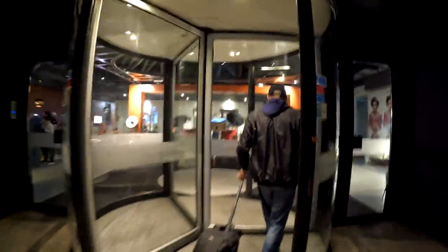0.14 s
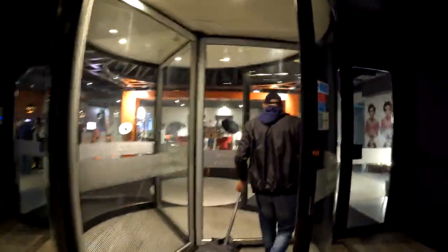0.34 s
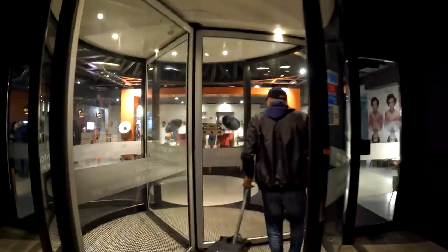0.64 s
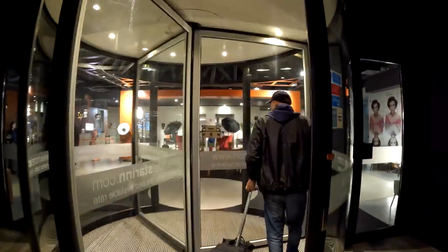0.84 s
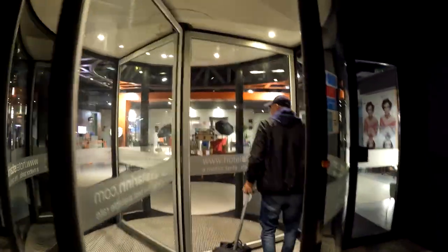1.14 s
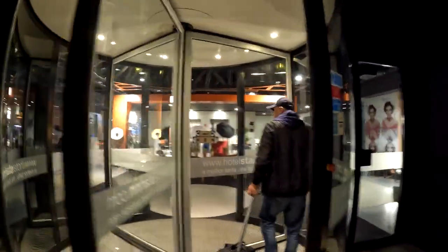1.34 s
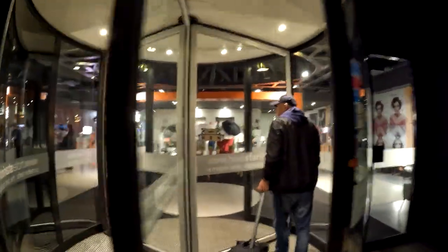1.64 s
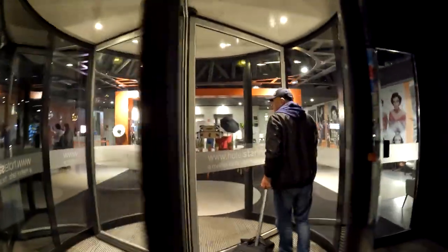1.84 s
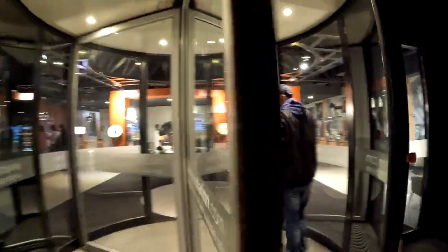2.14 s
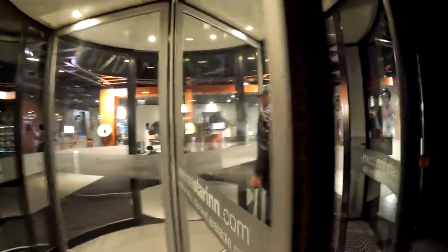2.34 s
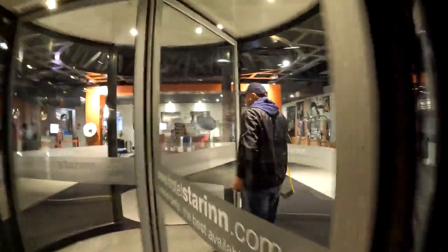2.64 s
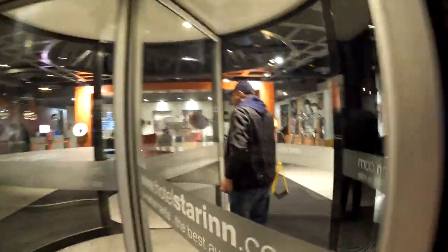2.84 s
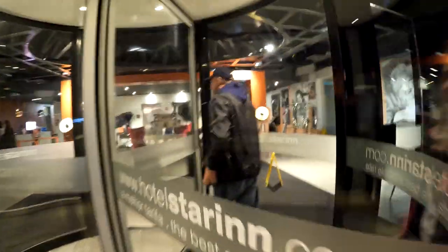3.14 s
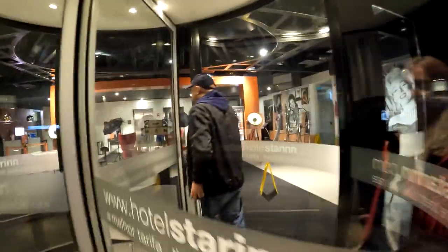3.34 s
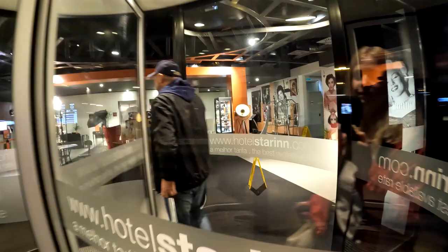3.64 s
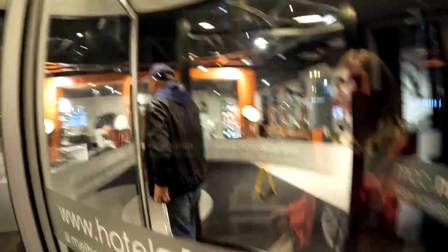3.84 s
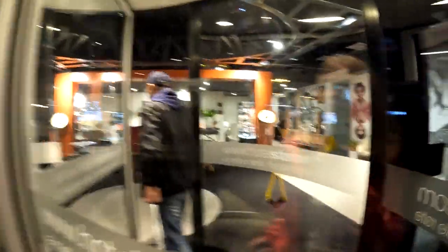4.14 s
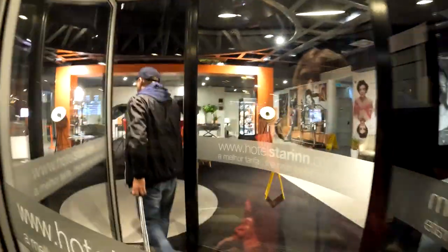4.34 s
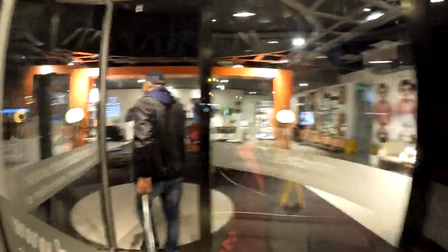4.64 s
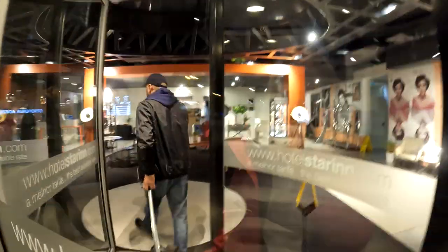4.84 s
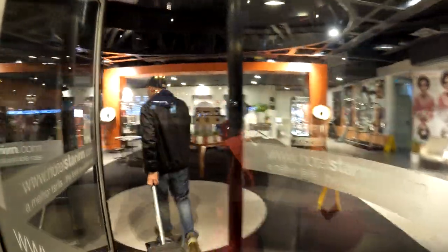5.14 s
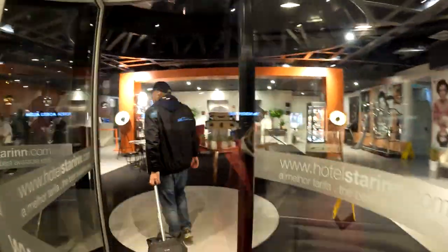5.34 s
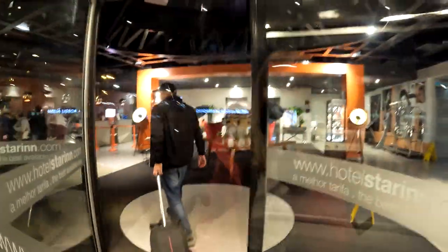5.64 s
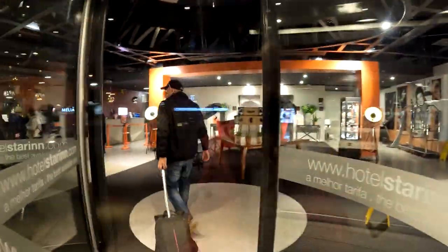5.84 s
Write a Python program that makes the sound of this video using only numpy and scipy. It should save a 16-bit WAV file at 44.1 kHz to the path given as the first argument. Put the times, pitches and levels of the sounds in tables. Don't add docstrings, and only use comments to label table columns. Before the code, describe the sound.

A hollow wheeled suitcase rolls close to a stereo microphone, entering a revolving glass door from the street. From 0 s a low, throbbing drone wavers under soft panel hums, with a steady dull wash of distant traffic and very faint hiss. Small plastic knocks, zip flicks and scuffs scatter through the first 1.2 s; then it is sparser and the rumble weaker, dipping around 2 s before a dull bump at 2.2 s. Low thuds at 3.1 s and a sharp click at 3.3 s lead to a heavy thump at 3.6 s. From 3.85 to 4.2 s the handle rattles and scrapes in a dense clatter, with hard wheel bumps and tiny metallic pings. Then the rumble grows fuller, with sparse ticks and a light bump at 4.8 s. It swells strongest near 5.65 s, with a low thud at 5.7 s and crisp taps until the end. Small sounds carry a brief enclosed reflection.

```python
import sys
import numpy as np
from scipy import signal
from scipy.io import wavfile
from scipy.ndimage import uniform_filter1d

SR = 44100
rng = np.random.default_rng(int(sys.argv[2]) if len(sys.argv) > 2 else 0)


def dump_mix(stems):
    frames = np.atleast_2d(stems).T
    limited = np.clip(frames, -1, 1)
    pcm = np.round(limited * 32767).astype(np.int16)
    wavfile.write(sys.argv[1], SR, pcm)


def boost_factor(decibels):
    exponent = np.asarray(decibels, float) / 20
    return 10 ** exponent


N = 264159
RUN_IN = SR // 2

# mode_hz, width_hz, level_db
DRONE_MODES = [(54.1, 5.5, 4.5), (59.3, 20.1, -0.5)]
# mode_hz, width_hz, level_db
LARGE_PANEL_MODES = [(106.2, 7.4, -3.5), (124.8, 24, -5), (140, 32, -4)]
# mode_hz, width_hz, level_db
SMALL_PANEL_MODES = [(188.7, 8.1, 1), (237.8, 8.3, -1.5), (279, 12.6, 0), (348, 70, -17.5)]
# time_s, level_db
WHEEL_LOAD = [(0, -23.5), (.15, -23.5), (.45, -21), (.85, -27), (1.25, -24), (1.6, -26), (2.0, -29),
              (2.25, -26), (2.7, -26.5), (3.4, -24.5), (3.55, -21), (4.4, -19), (4.65, -21.5), (4.85, -18),
              (5.1, -21.5), (5.3, -20), (5.65, -15), (5.99, -24.5)]
# centre_s, swell_db
LURCHES = [(.12, 0), (.42, 6.5), (.56, 6), (.98, -6), (1.97, 10), (2.27, 10.5), (2.88, 9.5), (2.99, 4.5),
           (3.06, 18), (3.22, 10.5), (3.37, 16.5), (3.6, -8), (3.95, 6), (4.3, 7), (4.62, -3), (4.84, 9),
           (5.05, 10), (5.2, 11), (5.4, 5), (5.72, 17), (5.91, 14)]
# centre_s, swell_db
SKIPS = [(.17, -3), (.38, -19), (.53, -4.5), (.77, 4), (.97, -40), (2.0, -19), (2.2, -24), (2.94, 0),
         (3.07, -8), (3.603, 1), (4.1, -4), (4.77, -3), (5.56, -5), (5.71, -15)]
# centre_s, swell_db
BOOMS = [(.02, 5.5), (.17, 8), (.33, 1.5), (.58, 8), (2.02, 13.5), (2.96, 7), (3.1, 10.5), (3.45, 9),
         (3.6, 8), (3.75, 5), (3.95, 7), (4.1, 7.5), (4.68, 10), (4.82, 11), (5.0, 6.5), (5.14, -2),
         (5.4, 3), (5.81, 6.5)]
# centre_s, swell_db
HUMS = [
    (.45, 7.9),
    (1.55, 2.8),
    (1.8, 4.8),
    (3.1, 3.5),
    (4.05, 0.99),
    (5.35, 7.3),
    (5.62, 8.9),
    (5.88, 4.9),
]
# freq_hz, level_db per Hz
STREET_SPECTRUM = [(47, -30), (80, -2), (113, -7.5), (276, -11), (340, -15), (471, -20), (592, -18.5),
                   (758, -23), (952, -19), (1420, -24.5), (2380, -34.5), (4500, -44), (7600, -52.5),
                   (9880, -84), (16700, -120)]
# freq_hz, level_db per Hz
AIR_SPECTRUM = [(8000, 6), (11000, 5), (13000, 0), (15500, -2)]
# time_s, level_db
TRAFFIC = [
    (0, -35.5),
    (1.5, -36),
    (3.7, -36.5),
    (4.05, -35),
    (4.35, -37),
    (5.99, -35),
]
# freq_hz, likeness (0 to 1)
LIKENESS = [(60, 1), (190, 1), (280, 0.98), (550, 0.89), (1100, 0.75), (2200, 0.52), (5000, 0.63),
            (9500, 0.87), (13000, 0.41)]
# freq_hz, left_minus_right_db
LEAN = [(250, 0), (520, 1), (1500, 2), (4400, 0), (8000, 1.5), (13000, 3)]
# start_s, length_s, pitch_hz, level_db
SINGS = [(0, 0.47, 255, -38.5), (.1, 1.1, 188, -33), (1.25, 0.99, 186, -36.5), (1.5, 0.56, 278, -35),
         (2.2, 0.4, 280, -43), (2.75, 0.39, 278, -34.5), (.1, 0.32, 120, -33), (3.0, 1.45, 105, -27.5),
         (3.3, 0.66, 230, -39), (4.1, 0.89, 178, -33.5), (4.95, 0.23, 140, -25.5), (5.12, 0.4, 140, -30.5),
         (5.55, 0.51, 310, -39)]
# start_s, peak_db, pitch_hz
KNOCKS = [(0.05, -44, 1090), (0.322, -45, 1690), (.542, -45, 1490), (.9956, -61, 1360), (1.108, -44, 1400),
          (2.7594, -56, 1350), (3.276, -56, 1310), (3.301, -53, 1500), (3.6094, -48, 1550),
          (3.644, -43, 1350), (3.842, -38, 1860), (3.921, -38, 1900), (3.915, -41, 1400),
          (4.015, -54, 1420), (4.109, -51, 2430), (4.171, -40, 1860), (4.206, -44, 1420),
          (4.344, -48, 1380), (4.916, -62, 1360), (5.056, -41.5, 1380), (5.504, -46, 1420),
          (5.564, -45, 1730), (5.692, -38, 1530), (5.759, -41, 1480), (5.8307, -37, 1500),
          (5.974, -47, 1820)]
# start_s, peak_db, brightness_db
FLICKS = [(.599, -35, -34), (.721, -34.5, -28), (.8969, -35, -32), (.9956, -36, -25), (1.063, -45, -7),
          (1.108, -38, -32), (1.175, -41, -12), (1.671, -33, -19), (2.398, -38, -18), (3.298, -45, -9),
          (3.859, -45, -29), (3.975, -44, -6), (4.002, -30, -40), (4.015, -29, -15), (4.091, -29, -27),
          (4.1094, -33, -3), (4.17, -34, -32), (4.206, -27.5, -37), (4.344, -32, -28), (4.822, -33.5, -23),
          (4.916, -42, -17), (5.191, -32, -16), (5.215, -48, -10), (5.307, -46, -8), (5.391, -29, -25),
          (5.503, -40, -25), (5.6915, -31, -33), (5.8296, -27, -40), (5.859, -34, -14), (5.908, -59, -11)]
# start_s, peak_db, brightness_db
SCUFFS = [(.143, -36, -26), (.298, -38.5, -17), (.33, -48, -22), (.452, -29, -30), (.542, -36, -18),
          (.964, -33.5, -28), (2.296, -35, -28), (2.473, -44, -20), (2.7594, -44, -24), (3.278, -30.5, -22),
          (3.308, -33, -17), (3.4, -38, -28), (3.6094, -32.5, -21), (3.644, -40, -21), (3.841, -25.5, -26),
          (3.972, -31, -16), (4.075, -25, -22), (4.358, -31, -21), (4.6423, -32.5, -13.5),
          (4.8928, -40, -22), (4.935, -49, -16), (5.033, -42, -15), (5.0554, -35, -27), (5.564, -35, -36),
          (5.759, -30, -22), (5.974, -29, -23)]
# start_s, peak_db, brightness_db
RUSTLES = [(.2, -39.5, -26), (.46, -48, -22), (.99, -47, -22), (2.3, -40, -27), (2.42, -41, -18),
           (2.72, -41, -23), (3.3, -48, -18), (4.88, -44, -13), (5.03, -44, -13), (5.2, -51, -18),
           (5.47, -38, -37), (5.86, -43, -15)]
# start_s, peak_db, knock_hz, t60_s
BUMPS = [(0.053, -13, 530, 0.013), (2.166, -3.5, 202, 0.015), (3.106, -10, 300, 0.031),
         (3.126, -5, 235, 0.027), (3.594, 4, 123, 0.043), (3.608, 2, 109, 0.028), (3.617, -22, 181, 0.046),
         (3.847, -23, 730, 0.038), (3.942, -20, 515, 0.021), (3.989, -19, 550, 0.025),
         (4.0291, -7, 152, 0.036), (4.0358, 8, 219, 0.011), (4.045, -8, 357, 0.021),
         (4.054, -28, 250, 0.028), (4.0844, -6, 117, 0.034), (4.088, -33, 910, 0.016),
         (4.123, -13.5, 392, 0.048), (4.126, -32, 890, 0.027), (4.128, -21, 1080, 0.018),
         (4.1335, -13, 380, 0.015), (4.1366, -9, 355, 0.033), (4.142, -8, 124, 0.059),
         (4.15, -23, 332, 0.11), (4.16, -22, 420, 0.041), (4.78, -10.5, 302, 0.026), (5.698, -11, 89, 0.14)]
# start_s, pitch_hz, level_db, length_s
PINGS = [(.468, 4000, -48, .034), (.49, 12300, -63, .035), (.492, 6950, -61, .03), (.556, 4000, -61, .044),
         (.721, 4015, -50, .05), (.995, 4015, -49, .048), (1.097, 4200, -52, .03), (1.155, 5030, -54, .03),
         (1.285, 9900, -68, .04), (1.95, 9900, -68, .04), (3.607, 9300, -61, .02), (3.648, 11300, -67, .03),
         (3.897, 6900, -53, .02), (3.97, 12800, -63, .03), (3.984, 11200, -53, .012),
         (4.02, 12800, -58, .03), (4.021, 11320, -47, .011), (4.031, 11320, -50, .009),
         (4.04, 11300, -47, .013), (4.215, 14300, -66, .06), (5.14, 6950, -59, .016),
         (5.216, 7050, -56, .012), (5.31, 11600, -61, .04), (5.562, 4300, -49, .011),
         (5.86, 9400, -54, .012), (5.873, 6900, -46, .034), (5.874, 9200, -55, .01),
         (5.93, 8700, -57, .018)]
# start_s, peak_db, centre_hz
CRACKS = [(.872, -44, 9000), (.957, -42, 11000), (1.671, -35, 9400), (3.3016, -25.5, 2760),
          (3.302, -32, 10300), (3.3021, -33, 12500), (3.3142, -37, 12500), (3.321, -42, 11500),
          (3.406, -42, 10000), (3.943, -40, 11000), (4.1115, -38, 6000), (4.112, -21, 10100),
          (4.1122, -27, 13000), (4.126, -25, 10500), (4.1706, -29, 1010), (4.25, -43, 9500),
          (4.45, -42, 3000), (4.775, -42, 8000), (4.917, -39.5, 3000), (5.1915, -40, 6500),
          (5.391, -42, 6500), (5.508, -40, 6000), (5.692, -35, 3330), (5.694, -37, 7800),
          (5.761, -33, 5000), (5.813, -45, 6000), (5.8295, -45, 4870), (5.8355, -33, 3560),
          (5.862, -46, 5000), (5.917, -34, 7040)]
# start_s, peak_db, pitch_hz, t60_s
TAPS = [(.894, -40, 3700, .04), (3.3012, -37, 2800, .008), (3.3014, -30, 5700, .007),
        (3.3016, -28, 1400, .008), (3.3135, -35, 7500, .01), (3.842, -31, 1850, .03),
        (3.848, -30, 1950, .03), (3.8573, -20, 2920, .028), (3.8685, -24, 3000, .03),
        (3.8705, -29, 3550, .015), (3.888, -32, 3100, .02), (3.9, -33, 3000, .015),
        (3.9096, -31, 3200, .025), (3.926, -31, 2500, .02), (3.935, -32, 1250, .025),
        (3.9535, -27, 3200, .02), (3.963, -29, 3750, .02), (3.9665, -24, 3120, .025),
        (3.975, -38, 7200, .02), (3.976, -38, 5600, .02), (3.977, -29, 2950, .02), (3.9855, -31, 3150, .02),
        (4.0064, -28, 3200, .03), (4.018, -29, 1200, .025), (4.023, -39, 7100, .015),
        (4.044, -35, 4200, .015), (4.087, -32, 4150, .015), (4.0925, -30, 4230, .02),
        (4.11, -32, 2400, .02), (4.171, -26, 1000, .01), (4.1713, -28, 1900, .015),
        (4.1715, -33, 3200, .01), (4.2015, -33, 3600, .012), (4.207, -30, 1800, .015),
        (4.2075, -33, 3500, .015), (5.6923, -27, 1550, .015), (5.6925, -33, 3000, .01),
        (5.6985, -28, 2000, .012), (5.7596, -22, 1520, .02), (5.76, -30, 2600, .012),
        (5.7655, -27, 2050, .012), (5.772, -38, 3200, .015), (5.8289, -19, 1500, .022),
        (5.829, -30, 2900, .012), (5.8345, -23, 2050, .015), (5.841, -33, 2600, .015),
        (5.898, -37, 2300, .012), (5.925, -38, 3300, .015), (5.9766, -27, 1800, .02),
        (3.2765, -40.5, 7560, .012), (3.277, -36, 11500, .012), (3.843, -44, 10200, .02),
         (3.872, -48, 9300, .015), (3.911, -42, 8300, .012), (3.927, -40, 5600, .015),
         (3.965, -36, 5570, .02), (4.007, -36, 5700, .015), (4.082, -37, 5460, .02),
         (4.096, -38, 5800, .015), (4.184, -38, 6500, .012), (4.345, -42, 4230, .025),
         (4.346, -40, 5300, .015), (4.364, -45, 4300, .03), (4.382, -44, 6200, .012),
         (4.643, -42, 7000, .012), (4.655, -39, 5800, .025), (4.832, -47, 5000, 0.0093),
         (5.192, -41, 5240, .015), (5.1925, -41, 7800, .015), (5.309, -49, 12300, .06),
         (5.31, -45, 7000, .015), (5.3915, -47, 5600, .012), (5.392, -46, 7300, .012),
         (5.506, -42, 5800, .015), (5.507, -43, 7400, .012), (5.597, -46, 7000, .01),
         (5.7505, -37, 7300, .01), (5.7507, -39, 10200, .01), (5.862, -40, 6800, .015)]
# mode_hz, width_hz, level_db
HANDLE_MODES = [(2040, 110, -19), (3000, 190, 8), (3110, 120, 2), (3730, 90, -14), (4750, 110, -18),
                (5470, 140, -15), (7300, 180, -12)]
# start_s, taps_db, scrape_db
TUGS = [
    (3.858, -36.5, -42.5),
    (3.92, -40, -39),
    (3.964, -47, -38),
    (4.008, -49, -41),
    (4.094, -43, -38),
    (4.202, -52, -46.5),
]
# above_hz, step_db
MIC_STEPS = [(8000, -7), (13100, -8)]


def in_time(rows):
    time_s, *columns = np.transpose(rows)
    return [np.interp(np.arange(N) / SR, time_s, column) for column in columns]


def rms_one(x):
    return x / np.sqrt(np.mean(x ** 2) + 1e-20)


def evened(x, seconds):
    return x / np.sqrt(uniform_filter1d(x ** 2, size=int(seconds * SR)) + 1e-12)


def at_hz(points, hz):
    freq_hz, value = np.array(points)[:, 0], np.array(points)[:, 1]
    return np.interp(np.log(hz), np.log(freq_hz), value)


def drift(rate_hz):
    r = np.exp(-80 * np.pi * rate_hz / SR)
    slow = signal.lfilter([1], [1, -2 * r, r * r], rng.standard_normal(N // 40 + 2002))[2000:]
    return np.interp(np.arange(N) / 40, np.arange(len(slow)), rms_one(slow))


def swells(rows, half_s):
    t = np.arange(0, N + 40, 40) / SR
    total_db = sum(swell_db * np.exp(-((t - centre_s) / half_s) ** 2) for centre_s, swell_db in rows)
    return np.interp(np.arange(N) / SR, t, total_db)


def band(x, low_hz, high_hz):
    return signal.sosfilt(signal.butter(2, [low_hz, high_hz], "band", fs=SR, output="sos"), x)


def resonate(x, modes):
    out = 0
    for k, (hz, width_hz, level_db) in enumerate(modes):
        r = np.exp(-np.pi * width_hz / SR)
        b = (1 - r * r) / 2 * np.array([1, 0, -1])
        a = [1, -2 * r * np.cos(2 * np.pi * hz / SR), r * r]
        out = out + (-1) ** k * boost_factor(level_db) * signal.lfilter(b, a, x)
    return out


def grit(per_s, spread_db, size=N):
    sizes = boost_factor(spread_db * np.minimum(rng.exponential(1, size), 4))
    sizes = sizes * rng.choice([-1, 1], size)
    return rms_one(sizes * (rng.random(size) < per_s / SR)) + 1e-18


def case_levels():
    load_db, = in_time(WHEEL_LOAD)
    change_db = load_db + 23
    shake_db = -32 + 0.34 * change_db + swells(LURCHES, half_s=0.052)
    drone_db = load_db + swells(SKIPS, half_s=0.03)
    large_db = -32 + 0.74 * change_db + swells(BOOMS, half_s=0.043)
    small_db = -34 - 0.4 * change_db + swells(HUMS, half_s=0.18)
    return shake_db, drone_db, large_db, small_db


def rolling(shake_db, drone_db, large_db, small_db):
    turns_per_s = 9.7 * (1 + 0.12 * drift(1.27))
    turn = np.cos(2 * np.pi * np.cumsum(turns_per_s) / SR)
    push = signal.lfilter([1], [1, -.97], grit(per_s=900, spread_db=3.0, size=N + RUN_IN))
    shake = evened(band(band(push, 14.6, 42.0), 17.0, 44.7)[RUN_IN:], seconds=0.34)
    drone = resonate(resonate(push, DRONE_MODES), [(52.8, 22.5, 0)])
    drone = evened(drone[RUN_IN:], seconds=0.07)
    large = evened(band(resonate(push, LARGE_PANEL_MODES), 76.0, 212)[RUN_IN:], seconds=0.085)
    small = evened(band(resonate(push, SMALL_PANEL_MODES), 163, 366)[RUN_IN:], seconds=0.46)
    frame = boost_factor(shake_db + 1.9 * turn) * shake + boost_factor(drone_db + 4.1 * turn) * drone
    return frame + boost_factor(large_db - 3.5) * large + boost_factor(small_db - 4.5) * small


def wash(spectrum, low_hz, count, patchy_db):
    out, together = 0, drift(0.63)
    edges_hz = low_hz * 2 ** (np.arange(count + 1) / 3)
    white = rng.standard_normal((2, 2, N + RUN_IN))
    for k, (low, high) in enumerate(zip(edges_hz, edges_hz[1:])):
        mid, side = band(white[k % 2], low, high)[:, RUN_IN:]
        hz = np.sqrt(low * high)
        alike = np.clip(at_hz(LIKENESS, hz), 0, 1)
        flicker = 0.21 * together + drift(17.6)
        gain = boost_factor(at_hz(spectrum, hz) + patchy_db * flicker)
        lean = boost_factor(at_hz(LEAN, hz) / 2 * np.array([[1], [-1]]))
        pair = np.sqrt(1 + alike) * mid + np.sqrt(1 - alike) * side * [[1], [-1]]
        out = out + gain * lean * pair
    return rms_one(out)


def street():
    level_db, = in_time(TRAFFIC)
    roar = wash(STREET_SPECTRUM, low_hz=81.7, count=20, patchy_db=1.0)
    hiss = wash(AIR_SPECTRUM, low_hz=7800, count=3, patchy_db=.5)
    return boost_factor(level_db + 6.5) * roar + boost_factor(-63.0) * hiss


def singing():
    out, waver = np.zeros(N + SR), boost_factor(1.8 * drift(9))
    wander_s = np.cumsum(1 + .012 * drift(4)) / SR
    for k, (start_s, length_s, hz, level_db) in enumerate(SINGS):
        i, t = round(start_s * SR), np.arange(round(length_s * SR)) / SR
        own = (np.arange(len(t)) + k * SR // 3) % (N - SR)
        ramp = np.clip(np.minimum(t, length_s - t) / 0.06, 0, 1)
        tone = np.sin(2 * np.pi * hz * wander_s[own])
        out[i:i + len(t)] += boost_factor(level_db) * waver[own] * tone * ramp
    return out[:N]


def loose_contacts():
    low, mid, top = np.zeros((3, N + SR))
    t = np.arange(SR // 4) / SR
    contacts = grit(per_s=9000, spread_db=5.5, size=3 * (N + SR)).reshape(3, -1)
    for start_s, peak_db, hz in KNOCKS:
        i = round(start_s * SR)
        at = slice(i, i + SR // 20)
        hit = 1.17 * np.exp(-t[:SR // 20] / 0.0094) * contacts[0, at]
        hit[[12, 40]] += 3.0, -3.0
        modes = [(hz, 260, 0), (1.52 * hz, 600, -5), (0.89 * hz, 500, -8), (1.75 * hz, 1200, -11)]
        low[at] += boost_factor(peak_db + 17.0) * resonate(hit, modes)
    for rows, length_s in (FLICKS, 0.011), (SCUFFS, 0.019), (RUSTLES, 0.08):
        swell = t / (.5 * length_s)
        swell = swell * np.exp(1 - swell) + 1e-12
        for start_s, peak_db, bright_db in rows:
            i = round(start_s * SR)
            at = slice(i, i + len(t))
            mid[at] += boost_factor(peak_db - 8.0) * swell * contacts[1, at]
            top[at] += boost_factor(peak_db + bright_db + 13.0) * swell * contacts[2, at]
    low = band(band(low[:N] + 1e-18, 1400, 6000), 920, 9800)
    mid = band(band(mid[:N] + 1e-18, 1460, 6100), 1740, 15000)
    top = band(band(top[:N] + 1e-18, 7600, 13000), 6600, 15000)
    shaded = np.roll(band(top, 6500, 12000), 1)
    bright = np.array([top * boost_factor(-4.0), shaded * boost_factor(-11.0)])
    return (low + mid) * boost_factor(np.array([[.6], [-.6]])) + bright


def bumps():
    out, t = np.zeros(N + SR), np.arange(SR // 4) / SR
    for start_s, peak_db, hz, t60_s in BUMPS:
        knock = np.sin(2 * np.pi * hz * t) + .5 * np.sin(2 * np.pi * 1.57 * hz * t)
        decay = boost_factor(peak_db - 60 * t / max(t60_s, .01))
        i = round(start_s * SR)
        out[i:i + len(t)] -= decay * knock * np.minimum(t * hz / 1.06, 1)
    return out[:N]


def pings():
    out, waver = np.zeros(N), boost_factor(1.5 * drift(90))
    for start_s, hz, level_db, length_s in PINGS:
        ring_s = max(length_s, .005)
        t = np.arange(round(ring_s * SR)) / SR
        i = round(start_s * SR)
        fade = boost_factor(level_db + 1.5 - 6 * t / length_s)
        out[i:i + len(t)] += fade * np.sin(2 * np.pi * hz * t) * np.sqrt(np.sin(np.pi * t / ring_s))
    return out * waver


def cracks():
    out, t = np.zeros(N + SR), np.arange(SR // 100) / SR
    for start_s, peak_db, hz in CRACKS:
        i = round(start_s * SR)
        shape = np.exp(-t * hz / 3.4) * np.minimum(t * hz, 1)
        out[i:i + len(t)] -= boost_factor(peak_db + 5.0) * np.sin(2 * np.pi * hz * t) * shape
    return out[:N]


def taps():
    out, t = np.zeros(N + SR), np.arange(SR // 20) / SR
    rise = 1 - np.exp(-t / 0.00015)
    for start_s, peak_db, hz, t60_s in TAPS:
        i = round(start_s * SR)
        decay = boost_factor(peak_db - 60 * t / max(t60_s, .003))
        out[i:i + len(t)] += decay * np.sin(2 * np.pi * hz * t) * rise
    return out[:N]


def tug_level(start_db, since_s, fall_db_per_s):
    change_db = np.minimum(1000 * since_s, -fall_db_per_s * since_s)
    return np.maximum(np.max(start_db + change_db, axis=0), -200)


def rattle():
    start_s, tap_db, rub_db = np.transpose(TUGS)[:, :, None]
    since_s = np.arange(N) / SR - start_s
    taps_db = tug_level(tap_db, since_s, fall_db_per_s=332)
    scrape_db = tug_level(rub_db, since_s, fall_db_per_s=90)
    strikes = band(grit(per_s=2600, spread_db=7.0) * boost_factor(2.5 * drift(40)), 1200, 6200)
    rub = band(grit(per_s=1800, spread_db=3.0), 610, 5100)
    hiss = band(grit(per_s=4300, spread_db=-2.0), 5000, 12000)
    strokes = drift(32)
    scrape = rub + 0.37 * boost_factor(2.0 * np.roll(strokes, SR)) * hiss
    rods = boost_factor(taps_db + 3.0) * rms_one(resonate(strikes, HANDLE_MODES))
    return rods + boost_factor(scrape_db + 1.0 + 1.8 * strokes) * rms_one(scrape) + 1e-18


def drum(x):
    t = np.arange(SR // 3) / SR
    t60_s = 0.13
    tail = rng.standard_normal((2, len(t))) * boost_factor(-60 * t / t60_s) * (t > .004)
    tail = signal.lfilter([1], [1, -.45], tail)
    tail = tail / np.sqrt(np.sum(tail ** 2, axis=1, keepdims=True))
    return signal.fftconvolve(x, tail, axes=1)[:, :N]


def scene():
    hard_parts = rattle() + pings() + cracks() + taps()
    parts = loose_contacts() + hard_parts * boost_factor(np.array([[1.0], [-1.0]]))
    case = rolling(*case_levels())
    unlike = boost_factor(-30) * np.roll(case + 2.5 * band(case, 15, 40), SR // 3) * [[1], [-1]]
    return case + unlike + bumps() + street() + parts + boost_factor(-9) * drum(parts) + singing()


def band_limit(x):
    return signal.sosfilt(signal.butter(12, 15600, fs=SR, output="sos"), x)


def record(dry):
    heard = dry
    for hz, step_db in MIC_STEPS:
        below = signal.sosfiltfilt(signal.butter(14, hz, fs=SR, output="sos"), heard)
        heard = below + boost_factor(step_db) * (heard - below)
    return band_limit(heard)


dry = scene()
out = record(dry)
dump_mix(out)
```